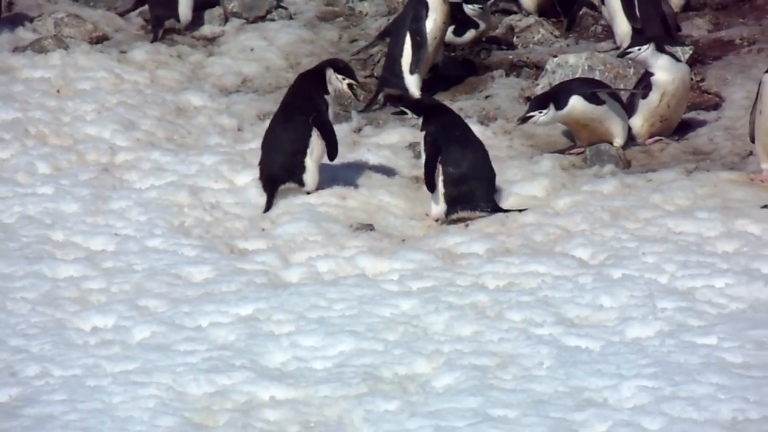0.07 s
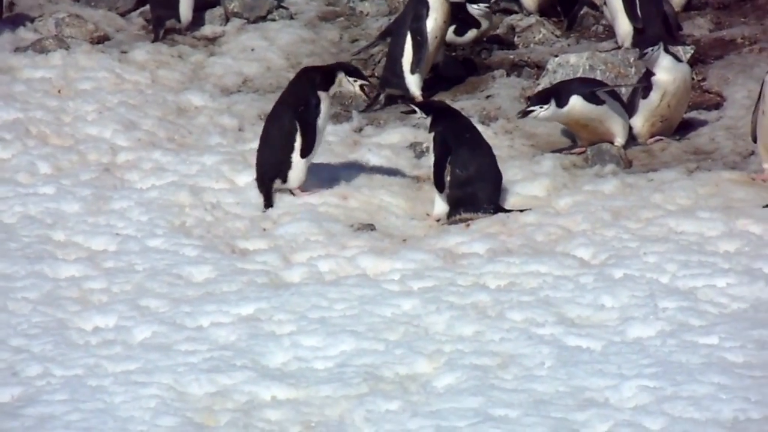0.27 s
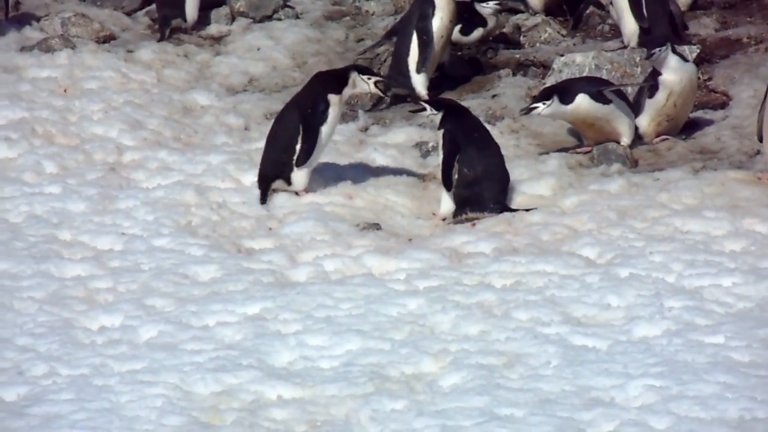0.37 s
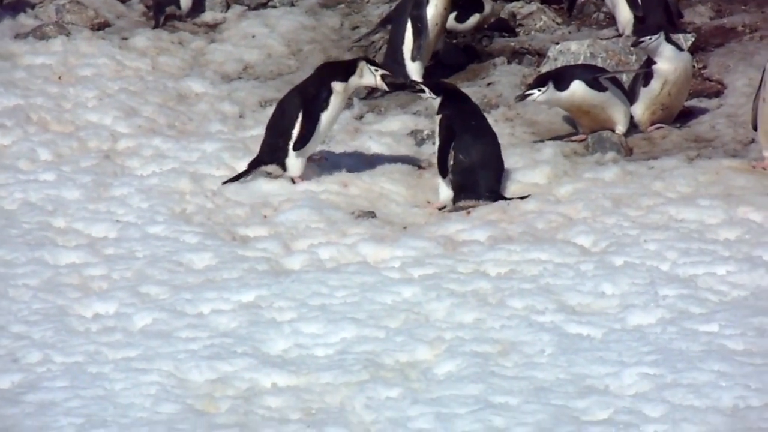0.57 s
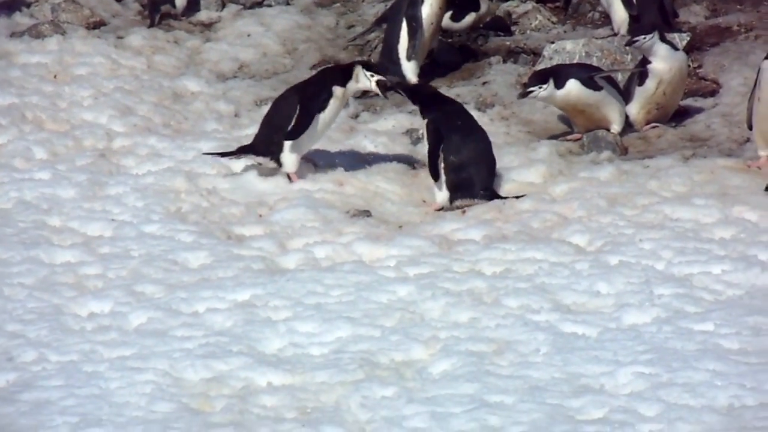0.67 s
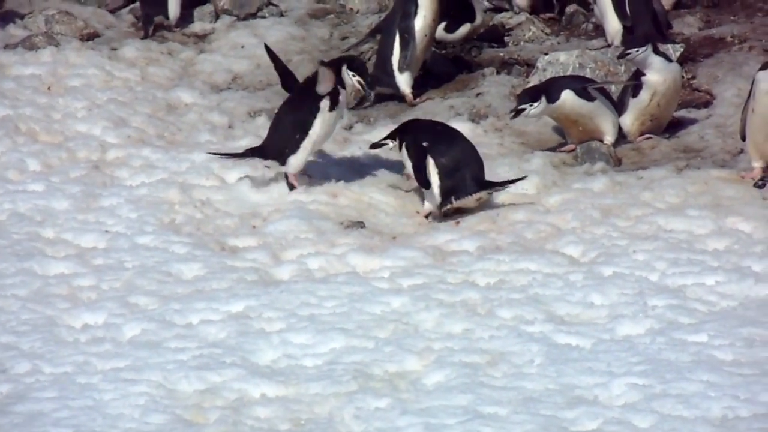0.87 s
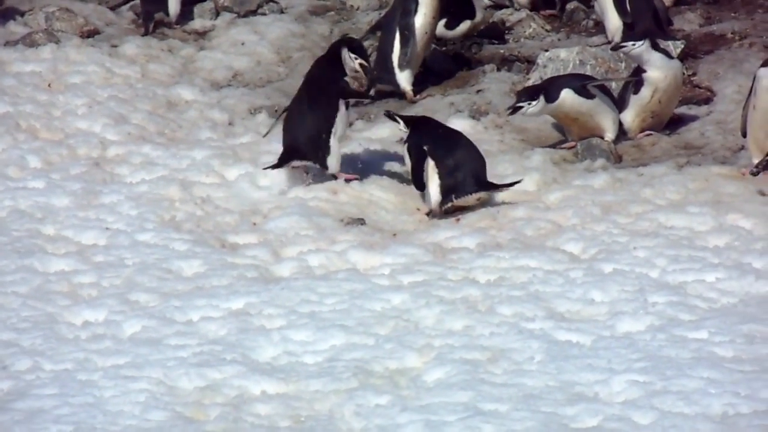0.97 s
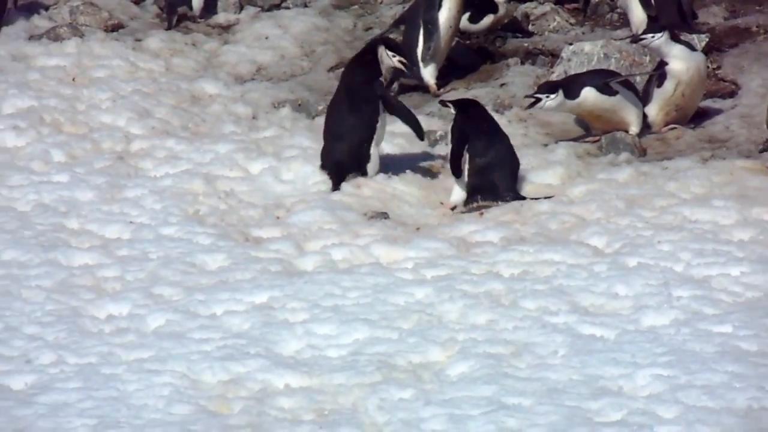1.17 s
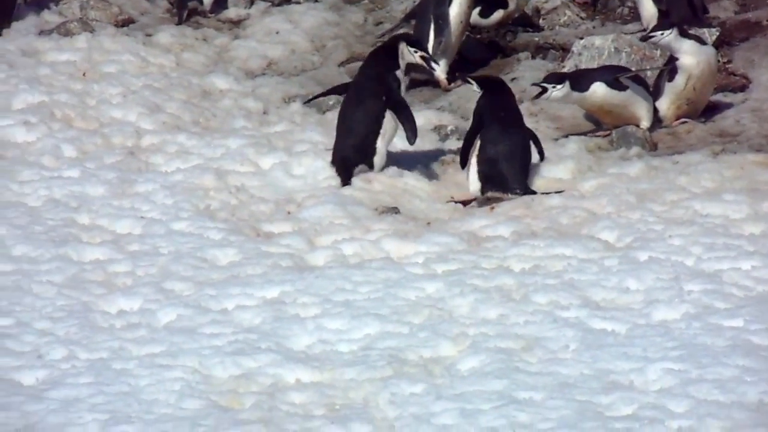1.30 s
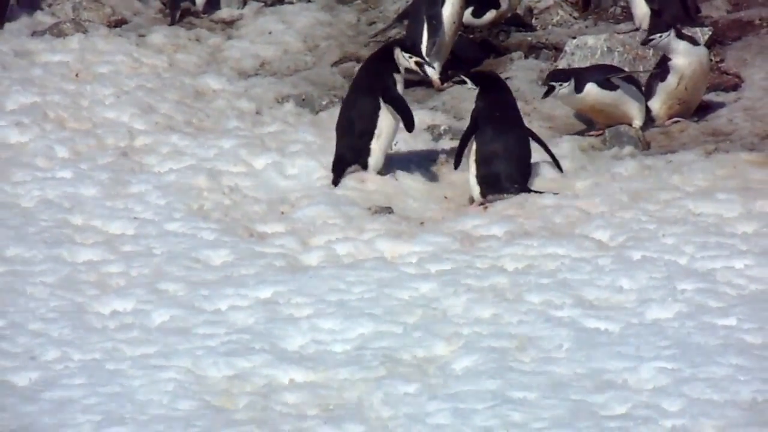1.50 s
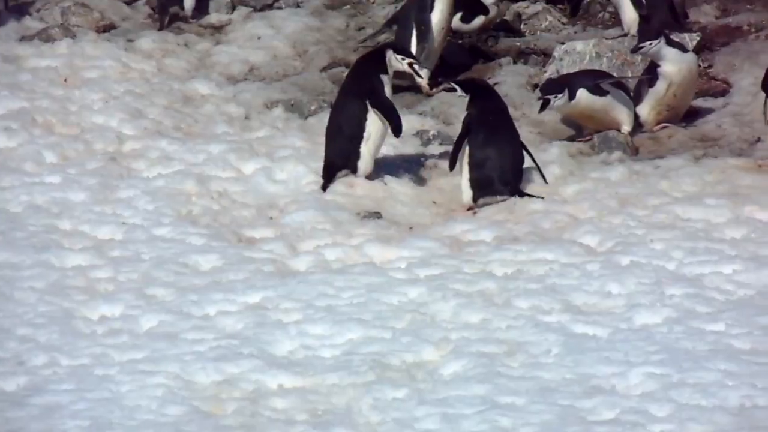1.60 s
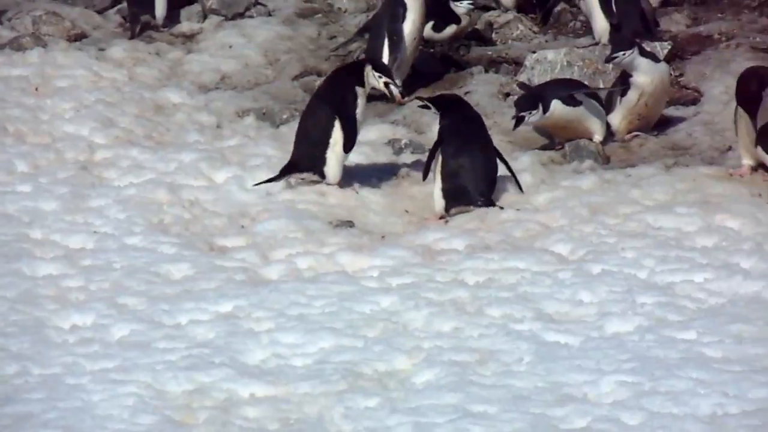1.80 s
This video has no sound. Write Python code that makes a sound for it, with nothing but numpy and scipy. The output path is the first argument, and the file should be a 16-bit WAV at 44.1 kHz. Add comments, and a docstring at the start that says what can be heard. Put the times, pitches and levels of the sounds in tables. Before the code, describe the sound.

Sparring penguins give a quick run of harsh, squealing honks, then two softer ones. Chicks peep faintly over the hush of a distant colony, while wind rumbles and bumps the microphone on open snow.

```python
"""Chicks peep over the faint wash of a colony; then two penguins spar on open snow, trading harsh honks.
Each honk is a source-filter voice: rough pulses and breath noise resonate in the throat and bill,
while a shrill second voice, modulated by the first, breaks through. The snow returns short echoes.
Wind eddies buffet mainly the right microphone port, and two small ticks sound."""
import sys
import numpy as np
from scipy import signal
from scipy.fft import rfft, irfft, next_fast_len
from scipy.io import wavfile
from scipy.ndimage import uniform_filter1d

SR = 44100
rng = np.random.default_rng(int(sys.argv[2]) if len(sys.argv) > 2 else 0)


def master(y):
    """Save y as 16-bit WAV."""
    cut = np.clip(np.atleast_2d(y).T, -1, 1)
    pcm = np.round(cut * 32767)  # scale
    wavfile.write(sys.argv[1], SR, pcm.astype(np.int16))


N = 81585
TIME = np.arange(N) / SR
FADE_S = .002


def amp(db):
    """Decibels to amplitude ratio."""
    return 10 ** (np.asarray(db) / 20)


def unit(x):
    """Normalisation to rms 1."""
    return x / np.sqrt(np.mean(x ** 2) + 1e-20)


def add(mix, start_s, sound):
    """Superposition: sums a sound into the mix at start_s."""
    at = round(start_s * SR)
    sound = sound[max(-at, 0):]
    part = mix[max(at, 0):][:len(sound)]
    part += sound[:len(part)]


def read(points, hz):
    """Interpolation of a spectrum on a log-frequency axis."""
    f, value = np.transpose(points)
    return np.interp(np.log(hz + 1), np.log(f), value)


def colour(x, spectrum):
    """Minimum-phase filtering by a spectrum in decibels."""
    log_gain = np.log(amp(read(spectrum, abs(np.fft.fftfreq(4096, 1 / SR)))))
    response = np.exp(np.conj(signal.hilbert(log_gain)))
    taps = np.fft.ifft(response).real[:2048]
    return signal.fftconvolve(x, taps)[:len(x)]


def wander(size, hz):
    """Random modulation: noise of rms 1, low-passed near hz."""
    f = np.fft.rfftfreq(SR, 1 / SR)
    spectrum = rfft(rng.standard_normal(SR)) * np.exp(-(f / hz) ** 2)
    return unit(irfft(spectrum))[np.arange(size) % SR]


def resonate(x, hz, width_hz):
    """A resonance of unit gain whose centre follows the curve hz."""
    carrier = np.exp(2j * np.pi * np.cumsum(hz) / SR)
    pole = np.exp(-np.pi * width_hz / SR)
    return 2 * (carrier * signal.lfilter([1 - pole], [1, -pole], x / carrier)).real


# Spectrum of the distant colony: frequency_hz, gain_db
WASH_SPECTRUM = [(30, 2.5), (250, -3), (700, 3.5), (1100, 2), (1700, 5.5), (2500, 2), (3200, -2),
                 (4500, -4.5), (6000, -11.5), (7500, -16), (11000, -19.5)]
# Its envelope: time_s, level_db
WASH_ENVELOPE = [(0, -43.5), (.07, -51), (.4, -56), (1.1, -56.5), (1.85, -55.5)]
def colony():
    """Partial coherence: the far colony blurs into noise, half its power common to both channels."""
    sway_db, sway_hz = 1.3, 14
    common = rng.standard_normal(N)
    wash = np.array([unit(colour(common + rng.standard_normal(N), WASH_SPECTRUM)) for _ in range(2)])
    level_db = np.interp(TIME, *np.transpose(WASH_ENVELOPE))
    return wash * amp(level_db + sway_db * wander(N, sway_hz))


# Calls of the chicks: start_s, length_s, top_hz, last_hz, level_db
CHICK_PEEPS = [(-.02, 0.19, 2146, 1656, -50), (0.029, 0.144, 1817, 1724, -55.5),
               (0.359, 0.065, 1830, 1460, -53), (0.456, 0.073, 1760, 1685, -50),
               (0.663, 0.025, 2197, 1840, -45), (1.318, 0.0695, 1720, 1610, -53),
               (1.393, 0.039, 1650, 1535, -53), (1.418, 0.065, 2090, 1646, -54.5),
               (1.609, 0.055, 1950, 1570, -53.5), (1.704, 0.043, 2140, 1597, -49),
               (1.401, .19, 4370, 4190, -66), (1.585, 0.082, 4460, 4370, -66.5)]
def chicks():
    """Whistles arch and fall; amplitude and frequency modulation make the shorter ones hoarser."""
    crest, rasp_hz = .15, 290
    out = np.zeros(N)
    for start_s, length_s, top_hz, last_hz, level_db in CHICK_PEEPS:
        progress = np.arange(0, length_s, 1 / SR) / length_s
        hoarseness = min(.23 / length_s, 2)
        hz = top_hz + (last_hz - top_hz) * (abs(progress - crest) / (1 - crest)) ** 1.5
        hz *= 1 + .014 * hoarseness * wander(len(hz), 490)
        rasp = .4 * np.cos(2 * np.pi * rasp_hz * length_s * progress) + .41 * wander(len(hz), 450)
        tone = np.sin(2 * np.pi * np.cumsum(hz) / SR) * (1 + hoarseness * rasp)
        add(out, start_s, amp(level_db) * unit(tone * np.sin(np.pi * progress) ** .5))
    return out


# Dry ticks, before filtering: start_s, level_db
TICK_BURSTS = [(1.2608, -37.5), (1.678, -45.5)]
def ticks(decay_s=.0012):
    """Exponential decay: brief noise transients, heard as small dry ticks."""
    out, t = np.zeros(N), np.arange(1000) / SR
    for start_s, level_db in TICK_BURSTS:
        add(out, start_s, amp(level_db) * rng.standard_normal(len(t)) * np.exp(-t / decay_s))
    return colour(out, [(1500, 14.5), (4000, -3), (10000, -4)])


# Eddies striking a port: centre_s, half_width_s, level_db, upper_edge_hz
EDDIES = [(0.572, 0.021, -30.5, 400), (.632, 0.0096, -15.5, 640), (0.675, 0.0042, -12.5, 420),
          (0.699, 0.0096, -19, 650), (0.812, 0.0099, -22, 610), (.832, 0.024, -27, 560),
          (0.876, 0.015, -31, 410), (1.052, 0.015, -28, 190), (1.159, 0.0082, -33, 410),
          (1.21, 0.012, -28, 332), (1.25, 0.0083, -22.5, 634), (1.296, 0.014, -29, 234),
          (1.32, 0.0098, -28, 594), (1.437, 0.013, -27, 328), (1.457, 0.0072, -19.5, 540),
          (1.477, 0.0073, -24.5, 570), (1.566, 0.0094, -25, 570), (1.579, 0.007, -21, 510),
          (1.639, 0.0095, -29.5, 350), (1.666, 0.0036, -23, 503), (1.754, 0.04, -29.5, 426),
          (1.8, 0.003, -17, 1030), (1.831, 0.066, -35.5, 560)]
def buffets(low_hz=90):
    """Turbulent pressure: each eddy shakes the microphone port with a few low, uneven cycles."""
    out, t, f = np.zeros(N), np.arange(-4096, 4096) / SR, np.fft.rfftfreq(8192, 1 / SR)
    for centre_s, half_width_s, level_db, edge_hz in EDDIES:
        envelope = np.exp(-(t / half_width_s) ** 2)
        band = f / np.hypot(f, low_hz) / np.sqrt(f + low_hz) / (1 + (f / edge_hz) ** 3.33)
        eddy = irfft(rfft(envelope * rng.standard_normal(len(t))) * band)
        add(out, centre_s + t[0], amp(level_db) * unit(eddy) * np.sqrt(np.mean(envelope ** 2)))
    return out


# Spectrum of the wind rumble: frequency_hz, gain_db
RUMBLE_SPECTRUM = [(10, -18), (40, 1.5), (150, -5.5), (300, -12), (600, -24), (1500, -70), (5000, -71.5)]
# Its envelope at the right port: time_s, level_db
RUMBLE_ENVELOPE = [(0, -62), (.18, -47), (.27, -73), (.42, -47), (.64, -30.5), (.8, -38.5), (1, -39.5),
                   (1.12, -45.5), (1.28, -27), (1.38, -40.5), (1.46, -37), (1.85, -34.5)]
def wind():
    """Turbulence is local: its noise is uncorrelated at the two ports, and the left one is sheltered."""
    left_rumble_db, left_buffet_db = -52, -39
    lumpy_noises = (rng.standard_normal(N) * amp(wander(N, 25)) for _ in range(2))
    left, right = (unit(colour(noise, RUMBLE_SPECTRUM)) for noise in lumpy_noises)
    right_rumble_db = np.interp(TIME, *np.transpose(RUMBLE_ENVELOPE))
    return np.array([amp(left_rumble_db) * left + amp(left_buffet_db) * buffets(),
                     amp(right_rumble_db) * right + buffets()])


# Reflections from ground and rocks: delay_s, amplitude_ratio
REFLECTIONS = [(.0017, 0.23), (.0046, 0.068), (0.013, 0.077)]
# Balance of the birds between the ports: frequency_hz, left_minus_right_db
PORT_BALANCE = [(500, 1), (1200, 0), (1700, 2), (2300, -11.5), (2800, -3), (3500, 7), (5000, -0.5),
                (9000, 2)]
# Phase between the ports: frequency_hz, left_lead_rad
PORT_LEAD = [(1000, -1), (2400, -1.2), (3400, -3.5), (4700, -1.25), (7000, -0.75)]
def outdoors(x):
    """Multipath propagation: direct sound, echoes and scatter off lumpy snow sum at each port."""
    scatter_db, scatter_t60_s = -8, .05
    size = next_fast_len(N + 8192)
    f, t = np.fft.rfftfreq(size, 1 / SR), np.arange(8000) / SR
    comb = 1 + sum(ratio * np.exp(-2j * np.pi * f * delay_s) for delay_s, ratio in REFLECTIONS)
    leftward = amp(read(PORT_BALANCE, f) / 2) * np.exp(1j * read(PORT_LEAD, f) / 2)
    scatter = rng.standard_normal((2, len(t))) * amp(-60 * t / scatter_t60_s)
    scatter /= np.linalg.norm(scatter[0])
    paths = comb * np.array([leftward, 1 / leftward]) + amp(scatter_db) * rfft(scatter, size)
    return irfft(rfft(x, size) * paths, size)[:, :N]


def squeal(start_s, length_s, first_hz, last_hz, level_db, beat, bend, low_cycles):
    """Amplitude modulation: the low voice chops a shrill glide into sidebands."""
    rise_s, fall_s, overtone_db, overtone_decay_s = .004, .006, -5, .009
    t = np.arange(0, length_s, 1 / SR)
    hz = last_hz + (first_hz - last_hz) * (1 - t / length_s) ** bend  # bend over 1 glides early
    hz *= 1 + .045 * beat * wander(len(t), 500)
    phase = 2 * np.pi * np.cumsum(hz) / SR
    low_phase = 2 * np.pi * low_cycles[round(start_s * SR):][:len(t)]
    # Overtones flash at the onset, less so when the voices beat.
    flash = amp(overtone_db) * np.exp(-7 * beat - t / overtone_decay_s)
    tone = np.sin(phase) + flash * (np.sin(2 * phase) + np.sin(3 * phase))
    tone *= 1 + beat * (.62 * np.cos(low_phase) + .5 * wander(len(t), 400))
    envelope = np.minimum(t / rise_s, 1) * np.minimum((length_s - t) / fall_s, 1)
    return amp(level_db) * unit(tone) * envelope


def voice_source(pitch_hz, roughness):
    """Pulsed airflow with jitter, shimmer and puffs of noise; returns sound and cycle count."""
    split_hz, split_depth, puff_decay_cycles = 450, .16, .46
    jittered_hz = pitch_hz * (1 + .046 * (roughness + .081) * wander(N, 260))
    cycles = np.cumsum(jittered_hz) / SR
    # Period doubling: above split_hz, strong and weak pulses alternate.
    alternation = 1 + split_depth * (pitch_hz > split_hz) * np.cos(np.pi * cycles)
    onsets = np.diff(np.floor(cycles), prepend=0) * alternation
    late_samples = np.clip(cycles % 1 * SR / jittered_hz, 0, 1)
    pulses = onsets * (1 - late_samples) + np.roll(onsets * late_samples, -1)
    shimmer = np.exp(.53 * roughness * wander(N, 580))
    puffs = (.097 + np.exp(-(cycles % 1) / puff_decay_cycles)) * rng.standard_normal(N)
    return np.sqrt(1 - roughness) * unit(pulses * shimmer) + roughness * unit(puffs), cycles


# Formants of the throat: frequency_hz, gain_db
THROAT_FORMANTS = [(200, -21), (370, -17), (540, -21.5), (720, -8.5), (900, -7), (1150, -7.5), (1600, 3),
                   (2100, -1.5), (2450, -5), (2720, -2), (3050, -13.5), (3450, -3), (4250, -8), (4650, -9),
                   (5350, -13), (6500, -20.5), (7400, -38), (8300, -23.5), (9400, -43), (10800, -44.5)]
def honk(contour):
    """Source-filter principle: throat and bill shape the pulses; returns sound and cycle count."""
    loud_db, bill_db, bill_top_hz, bass_hz = -30.5, 5, 1966, 990
    time_s, hz, db, roughness = np.transpose(contour)
    pitch_hz = np.interp(TIME, time_s, hz)
    level_db = np.interp(TIME, time_s, db, left=-120, right=-120)
    sounding = (TIME >= time_s[0]) & (TIME <= time_s[-1])
    source, cycles = voice_source(pitch_hz, np.clip(np.interp(TIME, time_s, roughness), 0, .95))
    voice = colour(source, THROAT_FORMANTS)
    # The bill opens with pitch and effort, and its resonance slides along.
    softness_db = np.clip(loud_db - level_db, -10, 11)
    bill_hz = np.minimum(4.4 * pitch_hz * 2 ** (-.11 * softness_db), bill_top_hz)
    voice += amp(bill_db) * resonate(voice, bill_hz, width_hz=400)
    voice /= np.std(voice[sounding])
    # Softer honks keep more of their low harmonics.
    bass = signal.sosfiltfilt(signal.butter(3, bass_hz, fs=SR, output="sos"), voice)
    voice += bass * (amp(.72 * softness_db) - 1)
    envelope = uniform_filter1d(amp(level_db), size=round(FADE_S * SR))
    return voice * envelope, cycles * sounding


# Low voice, one contour per honk: time_s, pitch_hz, level_db, roughness_ratio
HONK_CONTOURS = [
    [(.203, 266, -42.5, 0.79), (.238, 313.4, -28, 0.55), (.256, 358.9, -28.5, 0.35),
     (.28, 359.3, -24, 0.41), (.316, 314.6, -28.5, 0.88), (.352, 287.5, -26.5, 0.54), (.38, 251, -63, 0.97)],
    [(.421, 386, -63, 0.34), (.437, 390, -26, 0.28), (.447, 380, -30.5, 0.65), (.472, 398, -64, 0.9)],
    [(.498, 590, -30, .6), (.503, 574, -20.5, 0.6), (.535, 554.7, -24, 0.37), (.564, 513, -23, 0.13),
     (.578, 481, -35.5, 0.42), (.598, 536, -36.5, 0.3)],
    [(.598, 370.8, -37, 0.31), (.629, 383, -24, 0.7), (.65, 411, -25.5, 0.38), (.664, 360, -39.5, 0.8),
     (.68, 352, -64, .5)],
    [(.689, 583.6, -35.5, .2), (.7, 551.2, -17.5, 0.4), (.726, 533, -19, 0.55), (.75, 517.7, -23, 0.77),
     (.779, 499, -26.5, 0.77), (.8, 494, -48, 0.9)],
    [(.8, 290.8, -40.5, 0.51), (.828, 315.2, -31, 0.17), (.86, 363.6, -28.5, 0.48),
     (.878, 377.6, -27.5, 0.65), (.9, 356.2, -39, 0.34), (.922, 335.8, -37, 0.26), (.938, 353.8, -31, 0.54),
     (.954, 378, -36.5, 0), (.978, 313.8, -38, 0.4), (1.008, 309.5, -41, 0.53), (1.032, 260, -69, 0.5)],
    [(1.465, 351.4, -59.5, 0.38), (1.505, 324, -43.5, 0.63), (1.545, 268, -59, 0.1)],
    [(1.74, 379, -51, 0.71), (1.797, 431.4, -40, 0.42), (1.825, 392, -38, 0.3), (1.85, 392, -49.5, 0.1)],
]
# Shrill voice: start_s, length_s, first_hz, last_hz, level_db, beat_ratio, bend_exponent
SQUEAL_GLIDES = [(.226, .032, 1480, 1660, -28, .5, 1), (.298, .04, 2150, 1875, -25, .4, 2.4),
                 (.423, .026, 1220, 1110, -35, .15, 1), (.4985, .014, 1760, 1600, -20, .08, 1.4),
                 (.508, .06, 2350, 2000, -25, .4, .7), (.655, .017, 1740, 1690, -29, .3, 1),
                 (.688, .027, 1810, 1600, -16, .1, 2), (.718, .018, 1630, 1610, -20, .4, 1),
                 (.928, .026, 1970, 2180, -35, .5, 1), (.962, .045, 1400, 1240, -40, .45, 2)]
def penguins():
    """Biphonation: the sparring birds sound a low, rough voice and a shrill one at once."""
    voices, low_cycles = np.sum([honk(contour) for contour in HONK_CONTOURS], axis=0)
    for start_s, *glide in SQUEAL_GLIDES:
        add(voices, start_s, squeal(start_s, *glide, low_cycles))
    return voices


def scene():
    """Superposition of the birds and their echoes, ticks, colony and wind."""
    return outdoors(penguins() + chicks()) + ticks() + colony() + wind()


def record(dry):
    """Band limiting by a linear-phase low-pass filter, with a short fade at each end."""
    fades = np.minimum(np.minimum(TIME, TIME[::-1]) / FADE_S, 1)
    lowpass = signal.firwin(511, cutoff=11200, window=("kaiser", 9), fs=SR)
    return signal.oaconvolve(dry * fades, lowpass[None], "same")


dry = scene()
out = record(dry)
master(out)
```